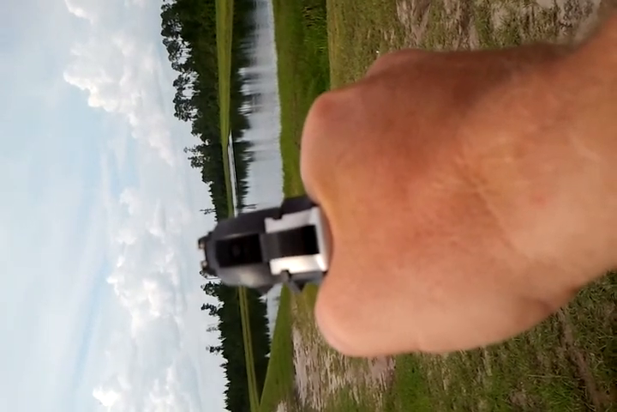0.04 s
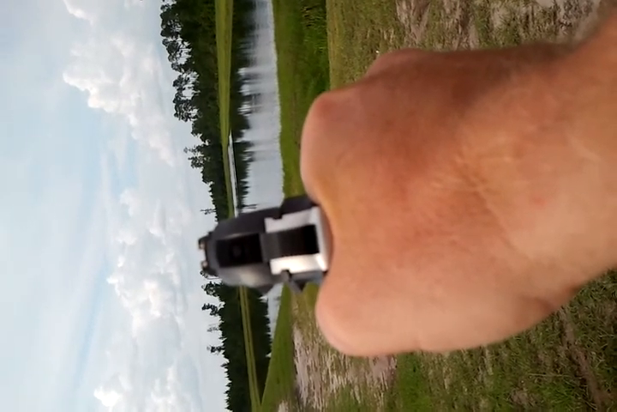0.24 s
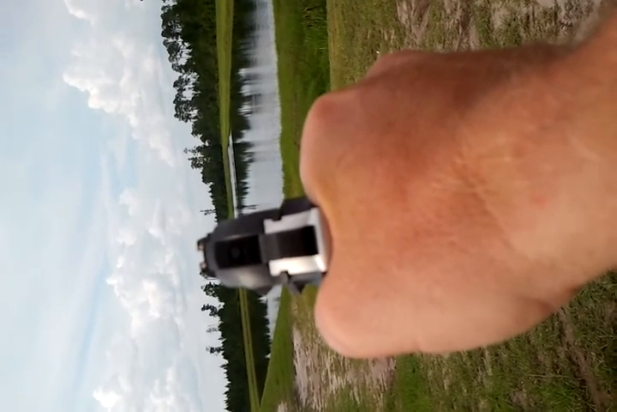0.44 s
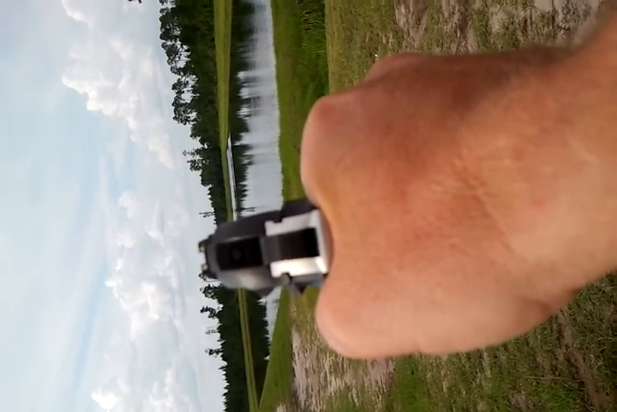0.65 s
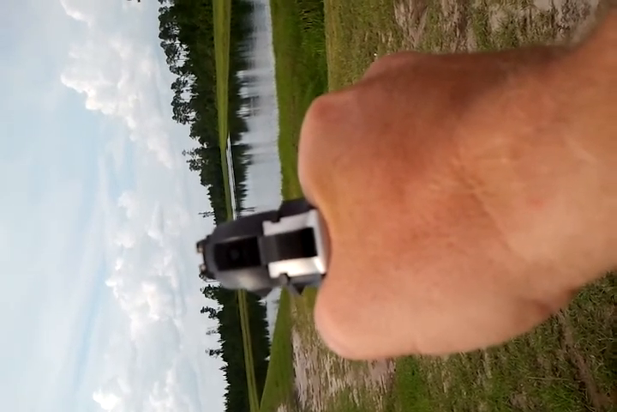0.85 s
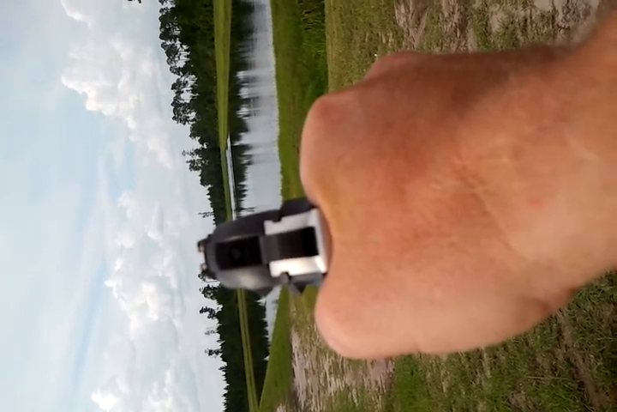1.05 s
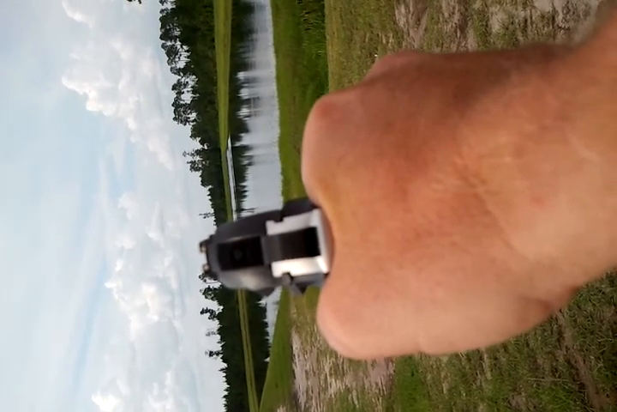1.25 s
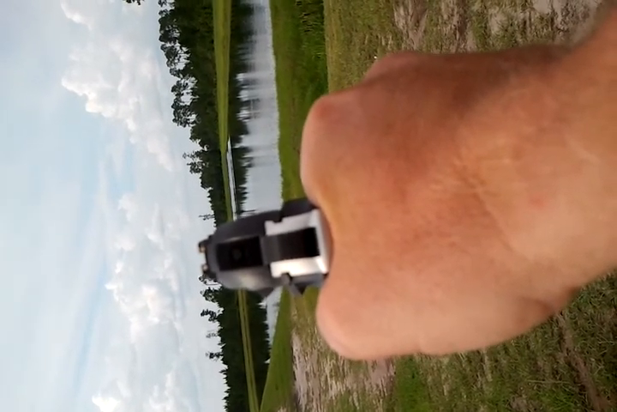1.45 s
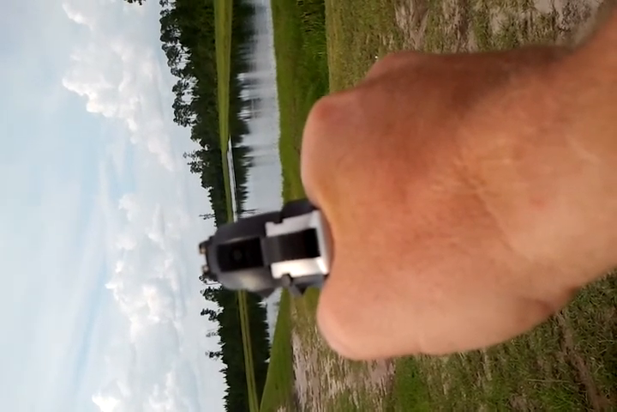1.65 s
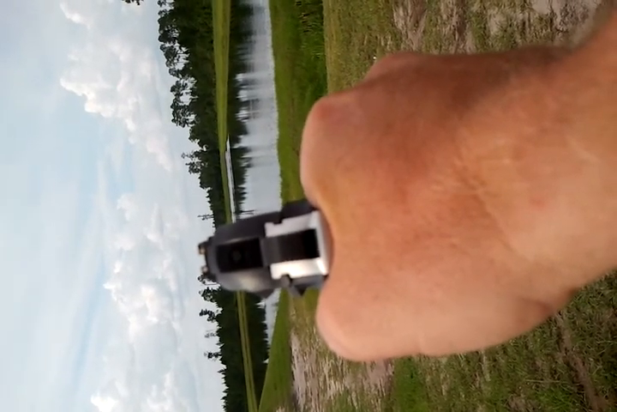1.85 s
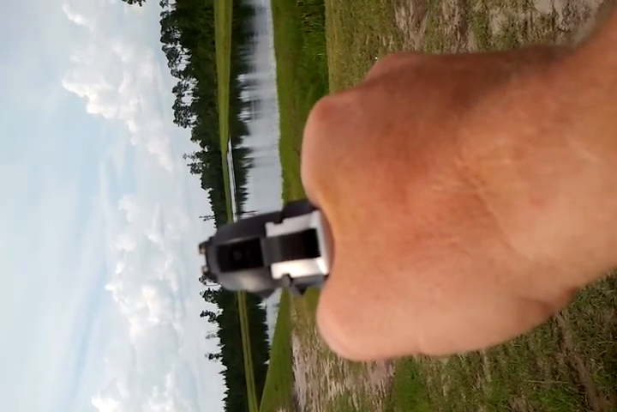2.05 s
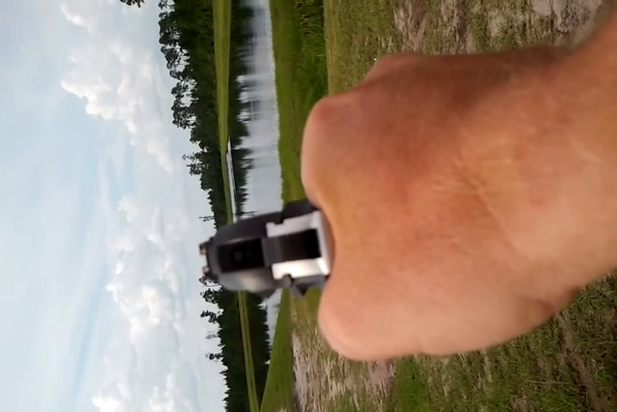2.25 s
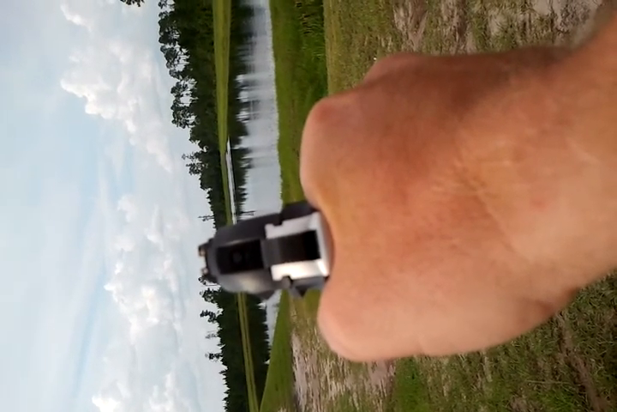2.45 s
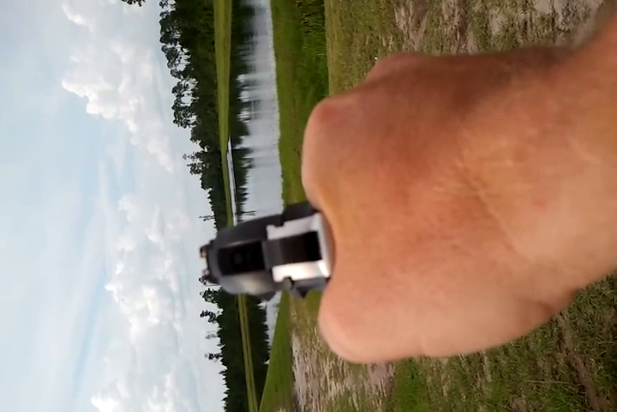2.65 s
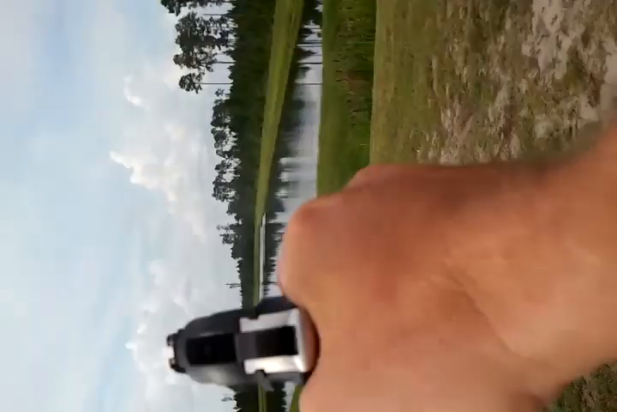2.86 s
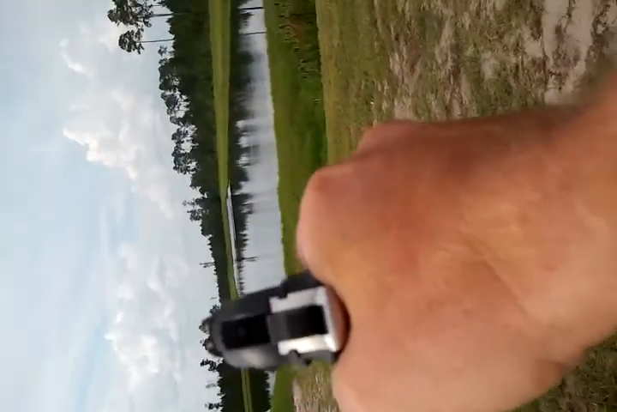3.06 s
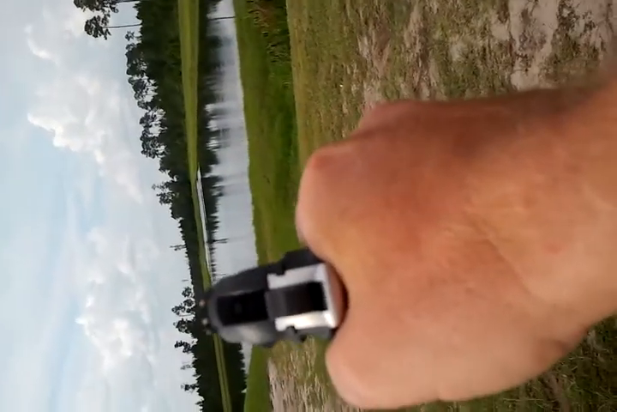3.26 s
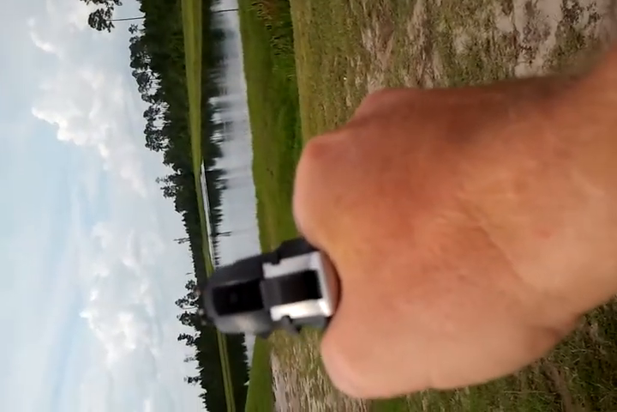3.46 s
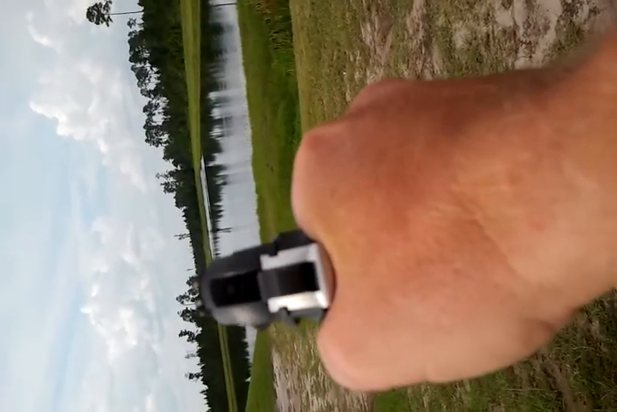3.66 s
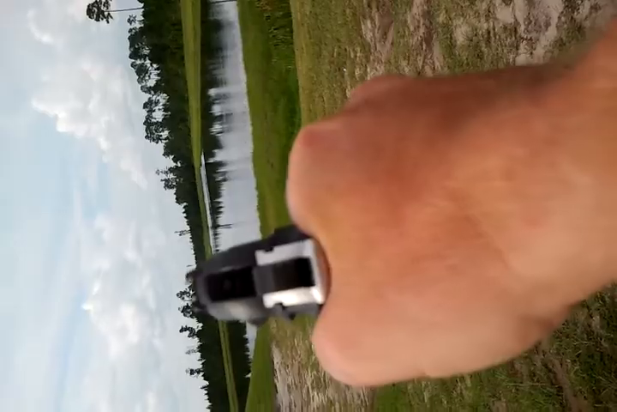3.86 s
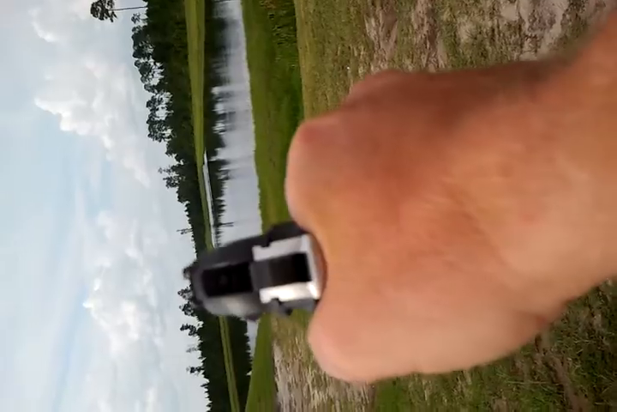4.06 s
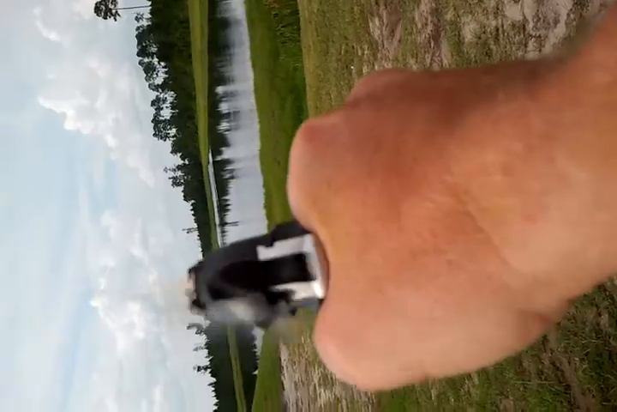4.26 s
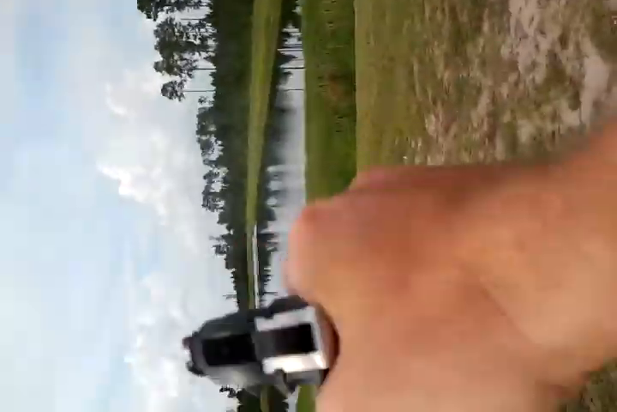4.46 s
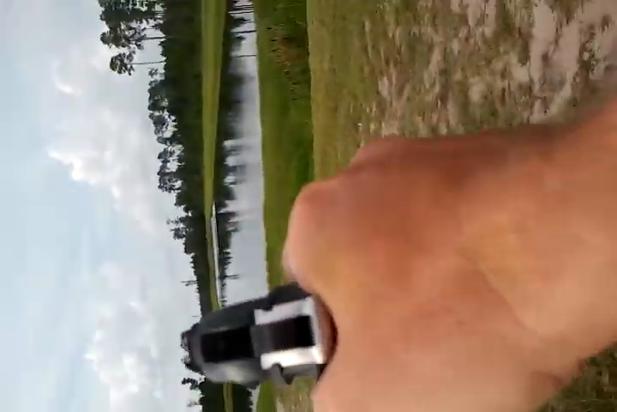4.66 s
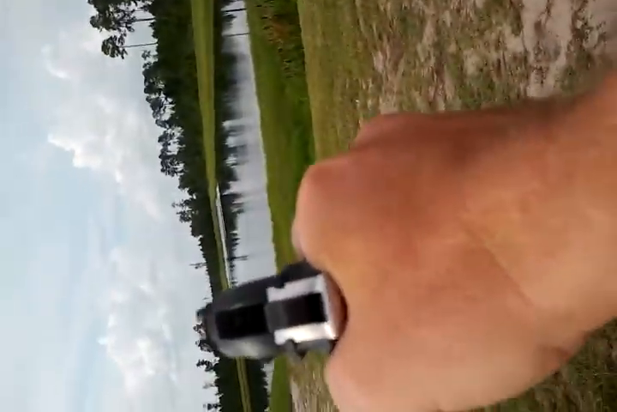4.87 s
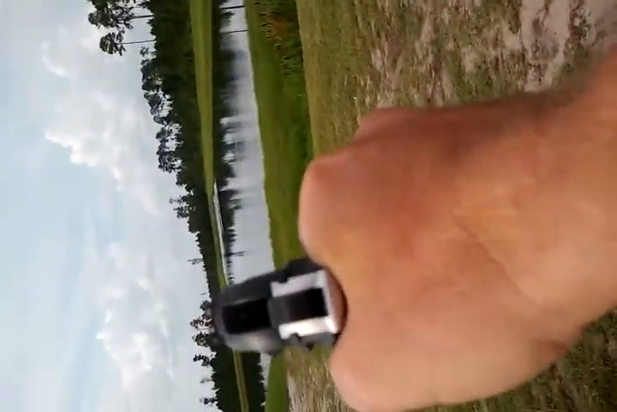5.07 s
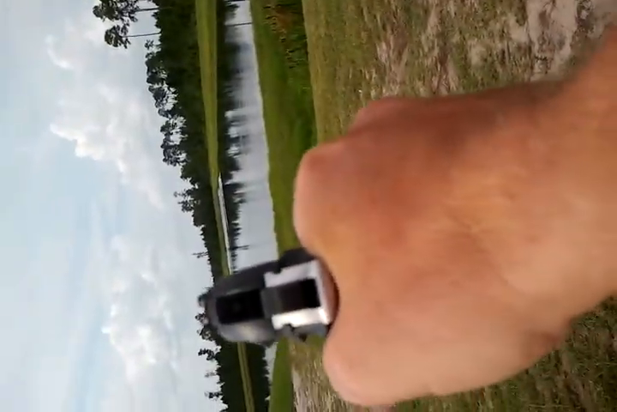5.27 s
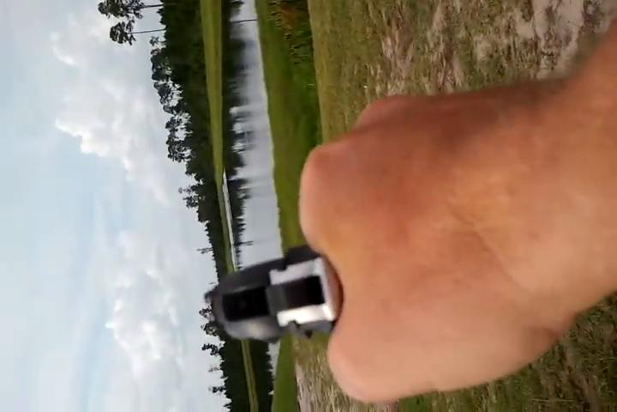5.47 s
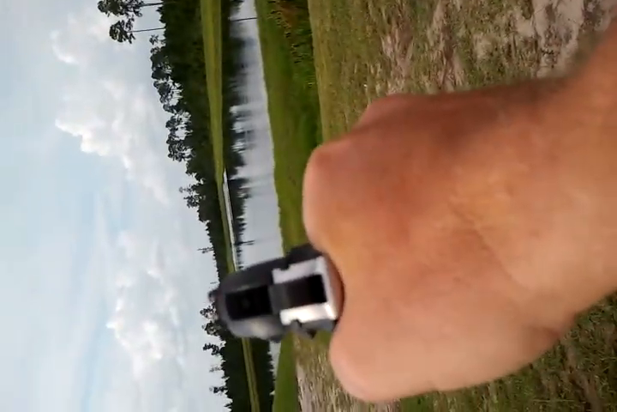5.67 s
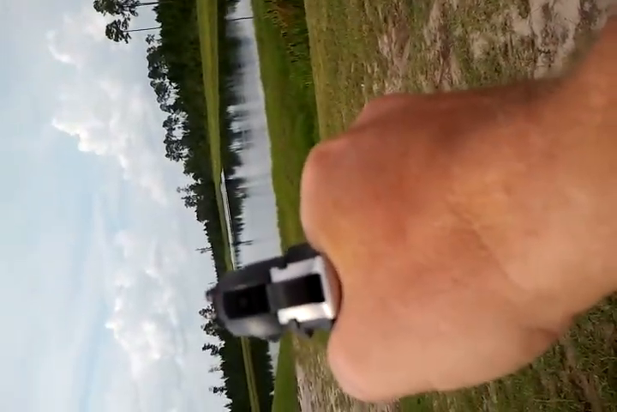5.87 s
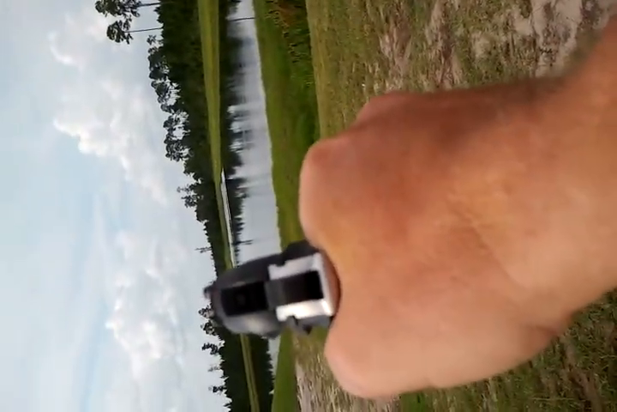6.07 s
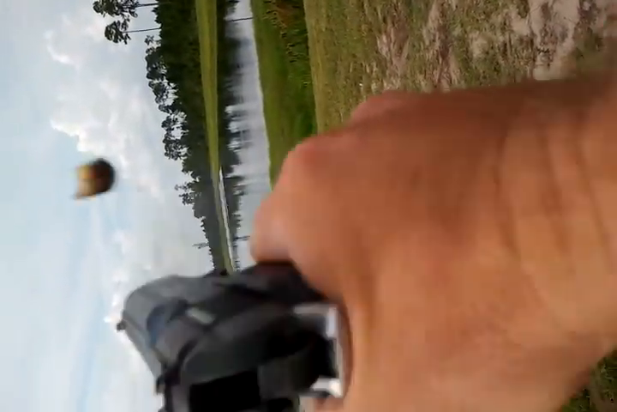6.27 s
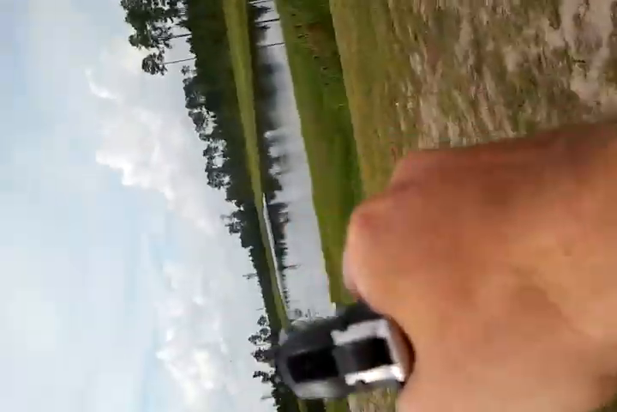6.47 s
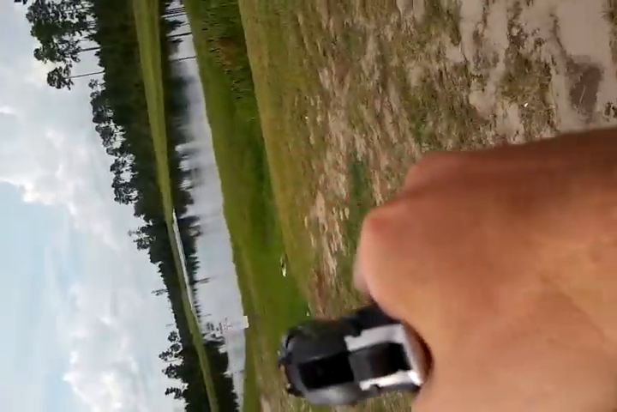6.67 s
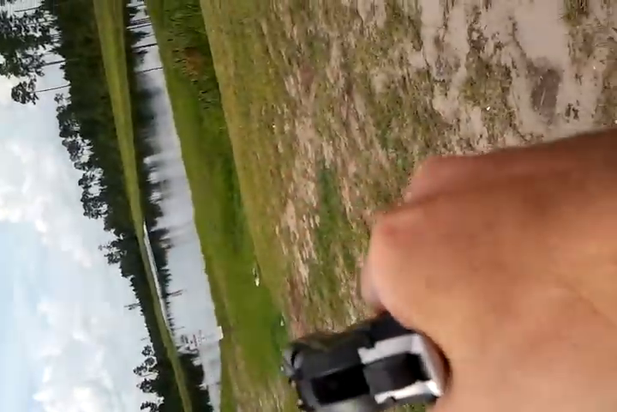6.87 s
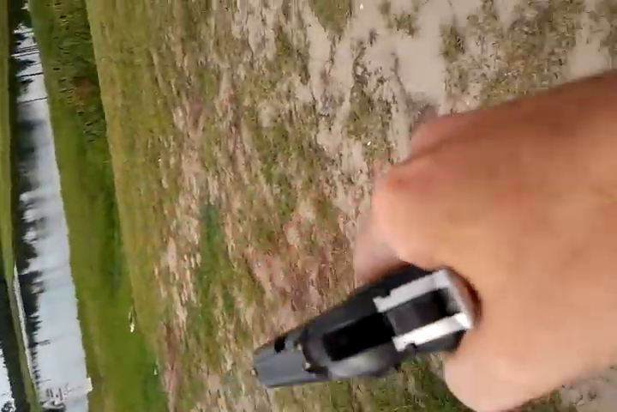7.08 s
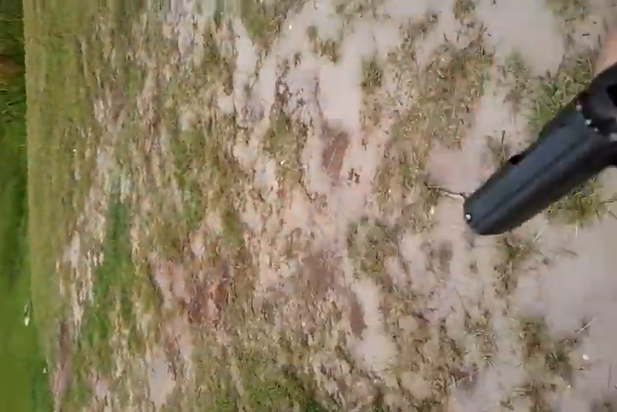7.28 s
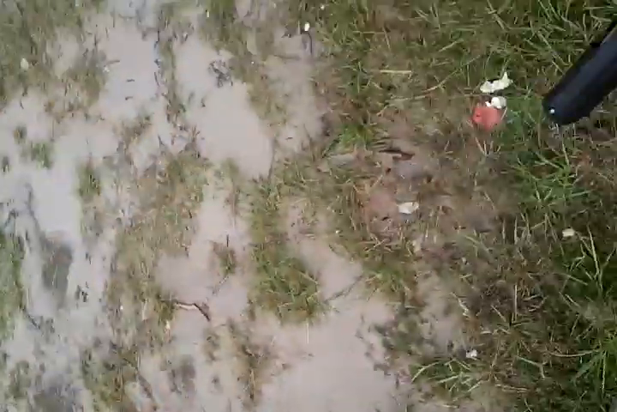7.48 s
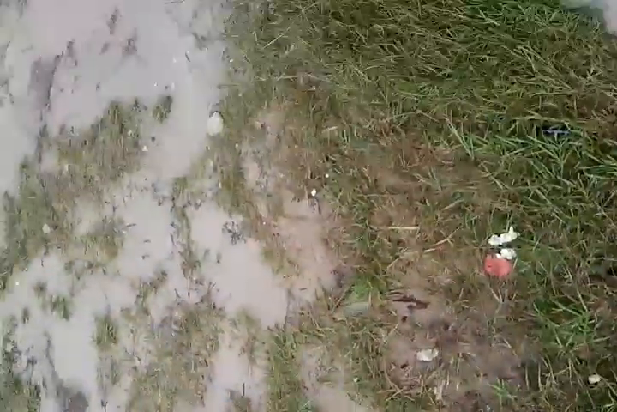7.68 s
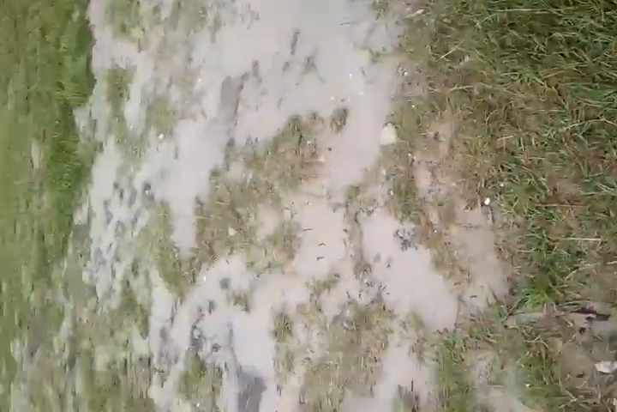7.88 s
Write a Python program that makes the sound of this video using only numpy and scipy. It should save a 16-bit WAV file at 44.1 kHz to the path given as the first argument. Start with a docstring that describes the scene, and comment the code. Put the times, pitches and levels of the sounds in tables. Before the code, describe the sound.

Quiet outdoor air with soft wind bumps, heard through a band-limited phone microphone. Three loud pistol shots, an arm's length away, clip and briefly choke the sound; each has a metallic slide slam, quick ground cracks, a distant bullet strike and a long fading echo from banks and trees. Casings and gun parts clack afterward, then a brightening sleeve-and-grass rustle closes.

```python
"""Light wind, distant air and hiss lie over an open field with a pond throughout; the microphone is a phone's.
Three pistol shots, an arm's length away: a hammer click, a noise blast that overloads and chokes the microphone,
the slide slam, then cracks off near ground, a bullet strike, and filtered-noise echoes off banks and far trees.
Between and after them cases and gun handling clack as struck noise, and low puffs bump the phone.
After the last shot a sleeve-and-grass rustle rises in pitch and the lowered pistol ticks."""
import sys
import numpy as np
from scipy import signal
from scipy.fft import rfft, irfft, next_fast_len
from scipy.io import wavfile

SR = 44100
rng = np.random.default_rng(int(sys.argv[2]) if len(sys.argv) > 2 else 0)


def unload_wav(signal):
    """Save mono or channel-first audio to the path in sys.argv[1] as 16-bit WAV at rate SR, clipped to [-1, 1]."""
    wavfile.write(
        sys.argv[1],
        SR,
        np.round(np.clip(np.atleast_2d(signal).T, -1, 1) * 32767).astype(np.int16),
    )


N = 350008
TIME = np.arange(N) / SR  # [s]

# the shots: (time [s], blast level [dB], slide delay [s], slide level [dB], field echo level [dB])
SHOT_EVENTS = [(2.8779, -3, 0.035, -6, -9), (4.412, -3, 0.033, -2.5, -9.5), (6.3852, -3, 0.037, -3.5, -9.5)]
# resonances of pistol and phone: (centre [Hz], width [Hz], level over the broad blast [dB])
BLAST_RESONANCES = [(535, 40, 11), (1060, 55, 4), (1897, 66, 14), (3620, 130, 4), (7230, 230, 6)]
# broad blast spectrum: (frequency [Hz], level [dB])
BLAST_SPECTRUM = [(40, -10), (200, 3), (700, 2.5), (2500, 1.5), (5000, -0.5), (7500, 0), (9000, -11.5)]
# echo spectrum: (frequency [Hz], level [dB])
FIELD_SPECTRUM = [(24, -63), (40, -41), (113, -17.5), (256, -7.5), (395, -10.5), (432, -12), (796, -2.5),
                  (999, -1), (1230, -1.5), (2770, -21.5), (4560, -21.5), (5590, -20.5), (6700, -10),
                  (8040, -17.5), (9000, -19), (11700, -81), (19800, -120)]
# bands that stand out in the echo: (centre [Hz], width [Hz], level over the spectrum [dB])
FIELD_RESONANCES = [(660, 120, -2.5), (1290, 130, -4), (1640, 340, -3), (2460, 500, 4), (3670, 560, 0)]
# extra loss in grass and air, negative where the band gains: (frequency [Hz], loss [dB/s])
GRASS_AND_AIR_LOSS = [(60, 20), (250, 37), (600, -3.5), (1100, -2.5), (2300, -4.5), (4000, 6.5), (7000, 35)]
# near ground and bank that answer every shot:
# (delay [s], level re field echo [dB], length [s], centre [Hz], treble re field echo [dB])
NEAR_PATCHES = [(0.051, -0.5, 0.0096, 1440, -8), (.06, -2.5, 0.025, 666, -12.5),
                (.104, -14, 0.024, 680, -2), (0.134, -5, .01, 455, -1), (.197, -1.5, .012, 970, -11),
                (0.233, -7, 0.015, 1100, -11), (0.275, -4, 0.013, 1050, -24)]
# bullets striking the far ground: (time [s], level [dB], length [s], centre [Hz], treble level [dB])
BULLET_STRIKES = [(3.033, -6.5, .026, 1720, -3.5), (4.579, -12.5, 0.022, 1370, -11),
                  (6.567, -13.5, 0.018, 1400, -13)]
# thin rings within the echoes: (time [s], centre [Hz], width [Hz], level [dB], swell [s], t60 [s])
ECHO_RINGS = [(3.0, 6600, 790, -11.5, 0.096, 0.49), (2.95, 296, 10, -27.5, .12, 1.5),
              (4.5, 6600, 600, -22, 0.073, 0.32), (6.48, 6000, 660, -20, 0.092, 0.29)]
# cases and gun handling: (time [s], body level [dB], body centre [Hz], bright level [dB], t60 [s])
HARD_KNOCKS = [(3.5768, -3.5, 1620, 0, 0.053), (3.653, -26, 1700, -26, 0.04),
               (4.8365, -1.5, 1171, 0.5, 0.047), (5.061, -15.5, 971, -42, 0.012),
               (5.2372, -4, 1850, -34, 0.0098), (5.3812, -10, 3200, -8.5, 0.04),
               (5.6582, -31.5, 2200, -30.5, 0.061), (6.8692, -0.5, 1340, -22, 0.0096),
               (7.078, -5.5, 1500, -15.5, 0.067), (7.276, -14.5, 2050, -11.5, 0.049),
               (7.3695, -22.5, 2390, -27, 0.023), (7.384, -18, 2230, -15, 0.0091),
               (7.5548, -32, 3000, -14, 0.0067)]
# bright spectrum of hard contact: (frequency [Hz], level [dB])
KNOCK_SPECTRUM = [(200, -7.5), (900, 1.5), (2800, -6.5), (3900, -4.5), (4800, -8), (5800, -4), (7200, 3),
                  (8200, -3.5), (9500, -5)]
# what hard knocks ring with: (centre [Hz], width [Hz], level over the spectrum [dB])
KNOCK_RESONANCES = [(1310, 57, 6.5), (1720, 110, 7.5), (1910, 200, 5), (2390, 140, 11), (4020, 220, 7),
                    (5730, 230, 9), (6740, 200, 4)]
# strongest bumps of wind and hand on the phone: (time [s], level [dB], centre [Hz], length [s])
PHONE_BUMPS = [(4.48, -18.5, 172, 0.082), (4.63, -26, 139.7, 0.08), (5.103, -20, 190, 0.014),
               (5.272, -24, 185, 0.016), (5.393, -23, 260, 0.064), (5.54, -25.5, 205, 0.022),
               (6.245, -24, 218, 0.026), (6.355, -21, 208, 0.011), (7.275, -24, 203, 0.026),
               (7.53, -26.5, 240, 0.013), (7.918, -26, 294, 0.024)]
# sleeve and grass as the arm comes down: (time [s], level [dB], centre [Hz])
SLEEVE_RUSTLE = [(6.901, -59, 1905), (7.201, -41.5, 2100), (7.449, -42, 2296), (7.7, -41, 2456),
                 (7.94, -46.5, 2656)]
# breeze on the microphone: (time [s], level [dB])
BREEZE_LEVEL = [(0, -46), (.9, -49.5), (1.35, -41.5), (1.7, -51.5), (3.4, -42), (4.25, -37), (5, -40.5),
                (5.6, -36), (6.9, -45), (7.9, -39)]
# breeze spectrum: (frequency [Hz], level [dB])
BREEZE_SPECTRUM = [(25, -28), (50, -13), (85, -3.5), (140, -1.5), (250, -4), (400, -13.5), (900, -36)]
# distant air spectrum: (frequency [Hz], level [dB])
AIR_SPECTRUM = [(15, -57), (25, -28), (58, -19.5), (182, -2.5), (257, -5), (306, -3.5), (515, -11.5),
                (687, -11.5), (1030, -12), (1110, -9), (1180, -13), (2500, -20), (3250, -42), (5500, -120)]
# faint distant hums: (centre [Hz], width [Hz], level over the air spectrum [dB])
DISTANT_HUMS = [(316, 33, 4), (675, 25, 4), (1100, 17, 8.5), (1690, 46, 5)]
# hiss spectrum: (frequency [Hz], level [dB])
HISS_SPECTRUM = [(1710, -35), (2900, -11.5), (3160, -9.5), (3820, -5.5), (4840, -15.5), (5450, -9),
                 (6070, -11), (6520, -5), (7340, -4), (8300, -14), (9000, -9), (11700, -64), (19800, -120)]

# the near ground answers first, then the far banks and trees swell up
GROUND_S, GROUND_DB = .054, -3.5
TREES_S, TREES_DB, TREES_SWELL_S, TREES_LOSS_DB_PER_S = .2, -0.95, 0.078, 13.5
TICKS_FROM_S, TICKS_UNTIL_S = 7.24, 7.35
TICK_DB, TICK_BRIGHT_DB, TICK_HZ, TICK_T60_S = -28, -29, 2500, .025
PUFFS_PER_S, PUFF_OVER_BREEZE_DB, PUFF_SCATTER_DB, PUFF_HZ, PUFF_S = 6, 5.5, 2, 245, 0.017
AIR_DB, HISS_DB = -40.5, -51.5
VOICE_BAND_HZ, TOP_HZ = 8074, 16200


def undb(db):
    """Decibels to gain."""
    return 10 ** (np.asarray(db) / 20)


def along(points, hz):
    """Read (Hz, value) points on a log-frequency axis."""
    f, value = np.transpose(points)
    return np.interp(np.log(hz), np.log(np.sort(f)), value)


def resonance(f, hz, width):
    """Gain of one resonance, 1 at its centre."""
    return 1 / np.sqrt(1 + ((f * f - hz * hz) / (f * width)) ** 2)


def colour(points, modes=()):
    """A broad spectrum with resonances added to it in power, as a gain against frequency."""
    def gain(f):
        power = sum((undb(db) * resonance(f, hz, width)) ** 2 for hz, width, db in modes)
        return undb(along(points, f)) * np.sqrt(1 + power)
    return gain


def hump(hz, share):
    """A steep-sided band whose resonance width is a share of its centre."""
    return lambda f: resonance(f, hz, share * hz) ** 2


def shape(x, gain):
    """Filter x by a gain against frequency, to standard deviation 1."""
    n = next_fast_len(len(x), True)
    f = np.maximum(np.arange(n // 2 + 1) * SR / n, 1)
    y = irfft(rfft(x, n) * gain(f), n)[:len(x)]
    return y / np.std(y)


def noise(t, gain):
    """Coloured noise as long as t."""
    return shape(rng.standard_normal(len(t)), gain)


def struck(fade, gain):
    """Coloured noise under a fade, scaled to the standard deviation of that fade."""
    x = fade * noise(fade, gain)
    return x * np.std(fade) / np.std(x)


def burst(t, length, edge):
    """A plateau with a quick rise and an exponential end."""
    rise = 1 - np.exp(-t / edge * 4)
    return rise * np.exp(-np.maximum(t - length, 0) / edge)


def span(seconds):
    """Time axis of one event."""
    return TIME[:int(seconds * SR)]


def add(out, s, x):
    """Mix x into out at time s."""
    i = max(int(s * SR), 0)
    out[i:i + len(x)] += x[:max(N - i, 0)]


def blast(blast_db, slide_s, slide_db, rail_db=3.0, rattle_db=-28, coupling_hz=260):
    """Muzzle blast and slide slam, as an overloaded microphone passes them."""
    t = span(.12)
    rail = undb(rail_db)
    shock = noise(t, colour(BLAST_SPECTRUM, BLAST_RESONANCES)) * burst(t, 0.02, 0.00081)
    shock *= undb(blast_db) * np.exp(-t / 0.037)
    slam_envelope = burst(np.maximum(t - slide_s, 0), 0.0114, 0.00058)
    slam = undb(slide_db) * slam_envelope * noise(t, colour(KNOCK_SPECTRUM))
    # the suction behind the shock holds the membrane at its stop; only the highest peaks
    # break through, ever fewer as the threshold (in noise rms) rises
    choked = (t > .02) & (t < slide_s + .012)
    threshold = np.interp(t, [.02, .036], [1.1, 2.1])
    peaks = np.clip(6 * (noise(t, hump(470, 4.7)) - threshold), 0, rail) * choked
    coupling = signal.butter(1, coupling_hz, "high", fs=SR, output="sos")
    spikes = signal.sosfilt(coupling, peaks)
    rattle = undb(rattle_db) * burst(t, 0.062, .005) * noise(t, colour(BLAST_SPECTRUM))
    return np.clip(shock + slam, -rail, rail) + spikes + rattle


def hammer(level_db=-17):
    """The hammer's fall: a very short burst of bright noise."""
    t = span(.03)
    return undb(level_db) * burst(t, 0.0037, 0.00031) * noise(t, colour(KNOCK_SPECTRUM))


def reflection(db, length, hz, treble_db):
    """A short, coloured crack from ground or bank: the blast thrown back, or a bullet striking."""
    t = span(.15)
    envelope = np.minimum(t / 0.0003, 1) * np.exp(-np.maximum(t - length, 0) / 0.0062)
    body = undb(db) * noise(t, hump(hz, 0.7))
    treble = undb(treble_db) * noise(t, colour(KNOCK_SPECTRUM))
    return envelope * (body + treble)


def answer(t):
    """Echo strength t seconds after a shot: near ground, then trees, each weaker as 1 / distance."""
    path = np.maximum(t, GROUND_S)
    swell = np.clip((t - TREES_S) / TREES_SWELL_S + 1, 0, 1)
    onset = np.clip((t - GROUND_S) / 0.0016, 0, 1)
    ground = undb(GROUND_DB) * GROUND_S / path * onset
    trees = undb(TREES_DB - TREES_LOSS_DB_PER_S * (t - TREES_S)) * TREES_S / path
    return ground * (1 - swell ** 2) + trees * swell ** 2


def field(terrain, grain_db=4.0, slap_db=4.5, slap_hz=42, smooth_hz=3200, peak_s=0.13, merge_s=2.0):
    """Countless small echoes from grass, banks and trees, smoother with time as each band fades at its rate."""
    t = TIME[:len(terrain)]
    rough = np.exp(-t / merge_s)
    # half of the pattern belongs to the terrain, half changes with aim and wind
    pattern = terrain + rng.standard_normal(len(t))
    scatter = pattern * undb(grain_db * rough * noise(t, hump(450, 2.6)))
    echoes = rfft(shape(scatter, colour(FIELD_SPECTRUM, FIELD_RESONANCES)))
    f = np.maximum(np.arange(len(echoes)) * SR / len(t), 1)
    slaps = rough * np.tanh(1.4 * noise(t, hump(slap_hz, 1.4)))
    centres = [hz for hz, _ in GRASS_AND_AIR_LOSS]
    out = 0
    # each band is a triangle between its neighbours' centres
    for (centre, loss), share in zip(GRASS_AND_AIR_LOSS, np.eye(len(centres))):
        band = along(list(zip(centres, share)), f)
        # trunks and banks return separate slaps, grass returns the treble smoothly
        depth_db = slap_db / (1 + (centre / smooth_hz) ** 2)
        level_db = depth_db * (slaps - 0.077 * rough) - loss * (t - peak_s)
        out = out + irfft(echoes * band, len(t)) * undb(level_db)
    return out * answer(t)


def ring(hz, width, db, swell_s, t60):
    """A narrow resonance that builds up and dies away."""
    t = span(1)
    decay = np.exp(-np.log(1000) * np.maximum(t - swell_s, 0) / t60)
    envelope = np.minimum(t / swell_s, 1) ** 2 * decay
    return undb(db) * struck(envelope, hump(hz, width / hz))


def clack(body_db, hz, bright_db, t60, thud_db=-14, snap_db=5, snap_s=0.0016):
    """A hard knock: a bright snap at contact, a ringing body and a duller thud that lasts longer."""
    t = span(.2)
    fade = np.exp(-np.log(1000) * t / t60) * (1 - np.exp(-t / 0.00033))
    snap = 1 + undb(snap_db) * np.exp(-t / snap_s)
    modes = colour([(hz, 0)], KNOCK_RESONANCES)
    crack = struck(0.68 * fade * snap, colour(KNOCK_SPECTRUM, KNOCK_RESONANCES))
    body = struck(fade, lambda f: hump(hz, .8)(f) * modes(f))
    thud = struck(np.sqrt(fade), hump(hz / 2, 1.8))
    return undb(bright_db) * crack + undb(body_db) * (body + undb(thud_db) * thud)


def ticks(count=3):
    """The pistol's parts tick loosely, at random moments, while the arm drops."""
    out = np.zeros(N)
    for place in rng.random(count):
        s = TICKS_FROM_S + place * (TICKS_UNTIL_S - TICKS_FROM_S)
        add(out, s, clack(TICK_DB, TICK_HZ, TICK_BRIGHT_DB, TICK_T60_S))
    return out


def buffet(db, hz, length):
    """A soft low bump on the phone: a short burst of band noise."""
    t = span(.2)
    envelope = np.minimum(t / 0.0043, 1) * burst(t, length, 0.0059)
    return undb(db) * struck(envelope, hump(hz, 1.0))


def puffs():
    """Small random bumps of air whose level follows the breeze."""
    out = np.zeros(N)
    for place, size, pitch in rng.random((int(PUFFS_PER_S * N / SR), 3)):
        s = place * N / SR
        breeze_db = np.interp(s, *np.transpose(BREEZE_LEVEL))
        db = breeze_db + PUFF_OVER_BREEZE_DB + PUFF_SCATTER_DB * (2 * size - 1)
        add(out, s, buffet(db, PUFF_HZ * 2 ** (pitch - .5), PUFF_S))
    return out


def rustle(hiss_db=-6):
    """Sleeve and grass as the arm drops: a noisy band sliding upward, plus a fluttering treble swish."""
    s, db, hz = np.transpose(SLEEVE_RUSTLE)
    # the rustle brightens as the phone nears the ground
    sweep = np.cos(2 * np.pi * np.cumsum(np.interp(TIME, s, hz)) / SR)
    flutter_db = 2 * noise(TIME, hump(12, 2))
    swish = undb(hiss_db + flutter_db) * noise(TIME, hump(6400, 0.97))
    sliding = np.sqrt(2) * sweep * noise(TIME, hump(170, 2.6))
    return undb(np.interp(TIME, s, db, left=-100)) * (sliding + swish)


def breeze(gust_db=3):
    """Wind on the microphone: low noise whose level drifts and flutters."""
    drift_db = np.interp(TIME, *np.transpose(BREEZE_LEVEL))
    gusts_db = drift_db + gust_db * noise(TIME, hump(7.6, 1.8))
    return undb(gusts_db) * noise(TIME, colour(BREEZE_SPECTRUM))


def distant_air():
    """Steady distant air with faint hums, and hiss: two stationary coloured noises."""
    air = undb(AIR_DB) * noise(TIME, colour(AIR_SPECTRUM, DISTANT_HUMS))
    return air + undb(HISS_DB) * noise(TIME, colour(HISS_SPECTRUM))


def scene():
    """Shots, their echoes and the small sounds between them, over the open field."""
    out = distant_air() + breeze() + rustle()
    terrain = rng.standard_normal(len(span(2.6)))  # the same ground for every shot
    for s, blast_db, slide_s, slide_db, field_db in SHOT_EVENTS:
        add(out, s - .004, hammer())
        add(out, s, blast(blast_db, slide_s, slide_db))
        add(out, s, undb(field_db) * field(terrain))
        for delay, *patch in NEAR_PATCHES:
            add(out, s + delay, undb(field_db) * reflection(*patch))
    sources = ((BULLET_STRIKES, reflection), (ECHO_RINGS, ring), (HARD_KNOCKS, clack), (PHONE_BUMPS, buffet))
    for table, source in sources:
        for s, *row in table:
            add(out, s, source(*row))
    return (out + ticks() + puffs())[None]


def record(dry, clip_db=-3.5, ceiling_db=-2.5):
    """The phone clips, low-passes to the voice band, clips the overshoots again and cuts the top."""
    clipped = np.clip(dry, -undb(clip_db), undb(clip_db))
    voice_band = signal.butter(20, VOICE_BAND_HZ, fs=SR, output="sos")
    narrow = signal.sosfilt(voice_band, clipped)
    held = np.clip(narrow, -undb(ceiling_db), undb(ceiling_db))
    top_cut = signal.ellip(8, .1, 60, TOP_HZ, fs=SR, output="sos")
    return signal.sosfiltfilt(top_cut, held)


dry = scene()
out = record(dry)
unload_wav(out)
```